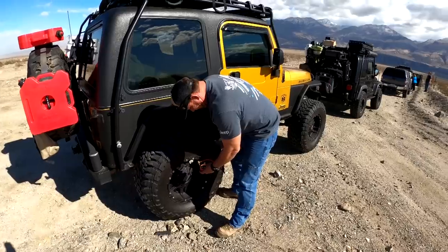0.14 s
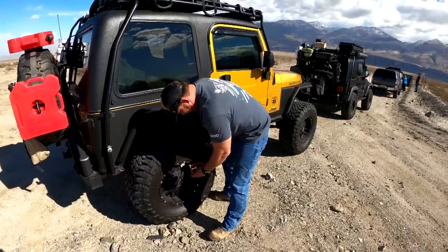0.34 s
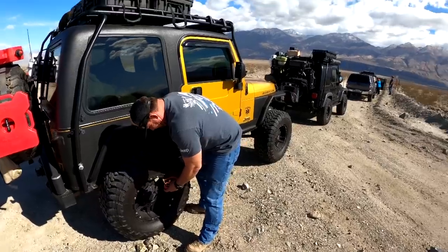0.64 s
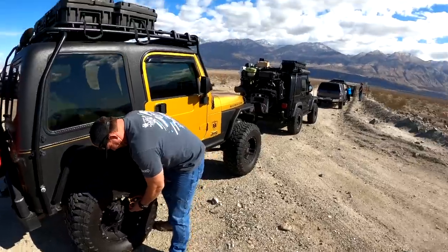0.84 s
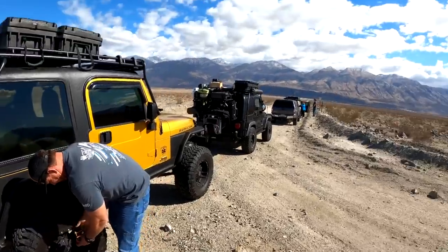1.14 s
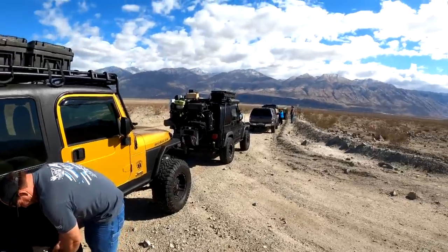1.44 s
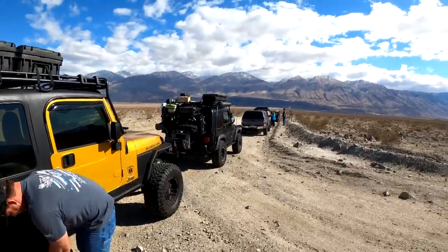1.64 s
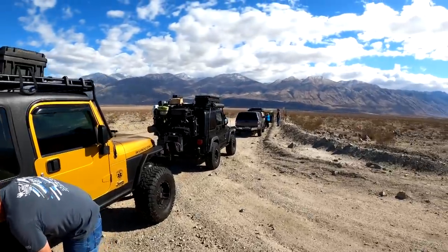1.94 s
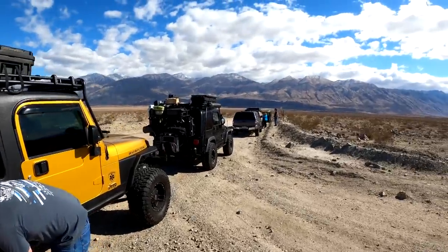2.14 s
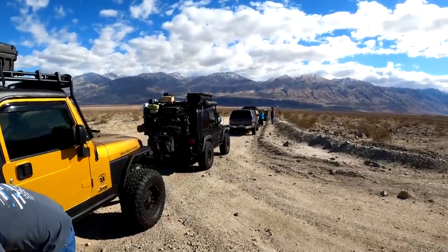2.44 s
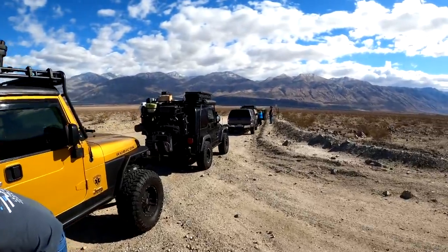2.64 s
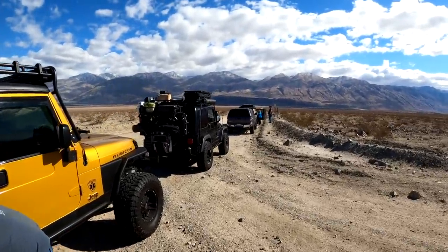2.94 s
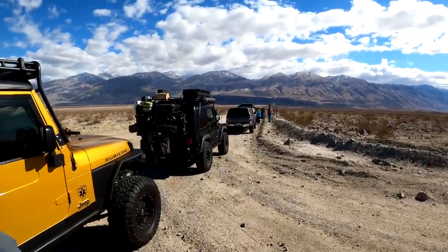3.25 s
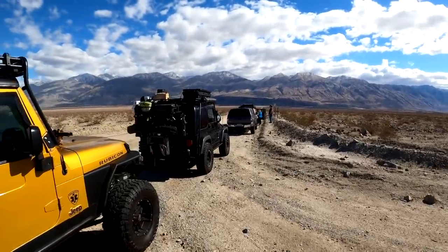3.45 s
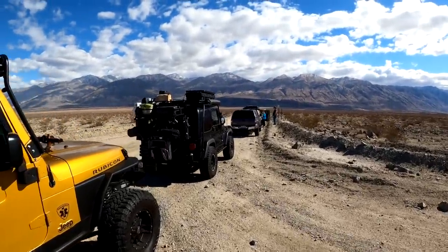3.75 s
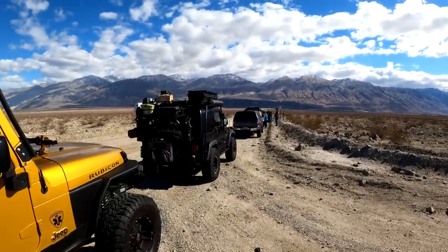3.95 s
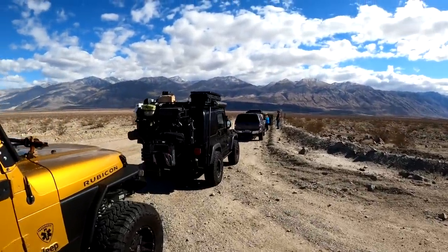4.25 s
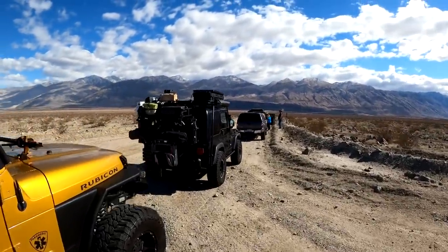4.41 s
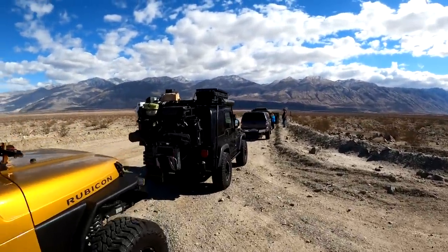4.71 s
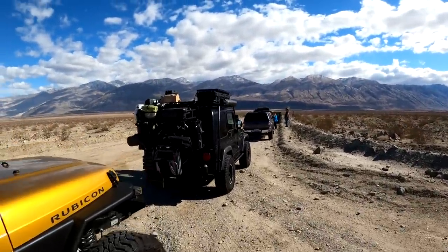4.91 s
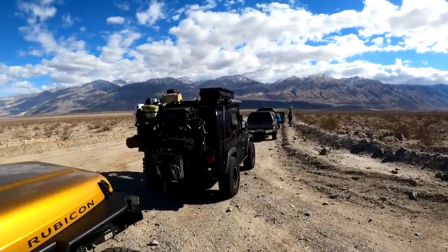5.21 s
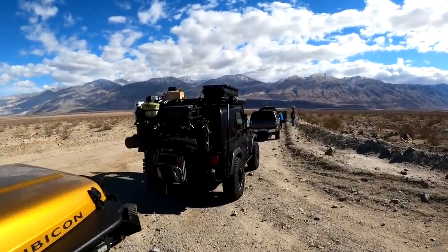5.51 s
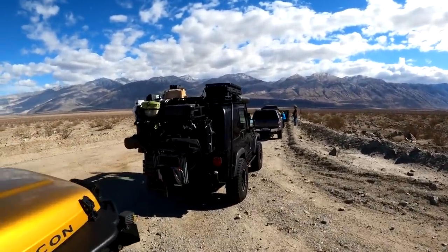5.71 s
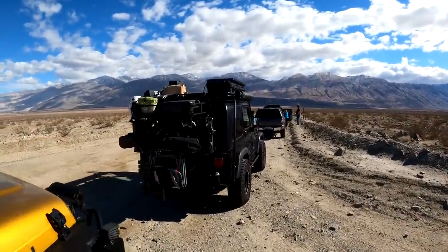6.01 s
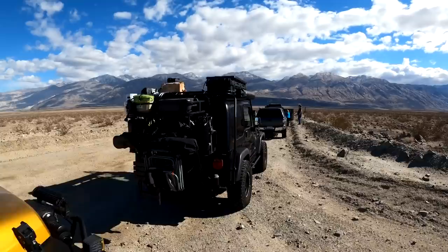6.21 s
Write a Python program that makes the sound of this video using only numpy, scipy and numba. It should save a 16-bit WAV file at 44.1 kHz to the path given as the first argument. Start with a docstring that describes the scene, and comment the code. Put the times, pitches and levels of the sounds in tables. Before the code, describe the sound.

A bright, unbroken hiss of escaping tyre air over buffeting low wind, growing duller and fainter as the microphone walks away across dirt and stones.

```python
"""On a dirt road, air hisses from the valve of an off-road tyre as a hand-held camera walks past and away.
The jet is shaped noise; delayed copies stand for echoes off wheel arch, panels and ground and comb its spectrum.
Moving resonances colour it; it fades as the camera recedes, and at last the bonnet shades its short waves.
Choppy wind on the microphone is low noise under gust envelopes, with rough puffs for the strongest eddies.
A few steps scuff the dirt as bursts of grainy noise; small stones knock as damped modes."""
import sys
import numpy as np
from scipy import signal
from scipy.fft import rfft, irfft, next_fast_len
from scipy.io import wavfile
from scipy.ndimage import uniform_filter1d, map_coordinates
from numba import njit

SR = 44100
rng = np.random.default_rng(int(sys.argv[2]) if len(sys.argv) > 2 else 0)


def persist_wave(psi):
    """Save psi, clipped to +-1, as 16-bit WAV."""
    counts = np.round(np.clip(psi, -1, 1) * 32767).astype(np.int16)
    wavfile.write(sys.argv[1], SR, np.atleast_2d(counts).T)


N = 280917
TIME = np.arange(N) / SR  # s

# strong eddies that strike the microphone port:
# [t/s, puff level/dB, length/s, speed relative to a typical eddy]
STRONG_EDDIES = [(0.09, -28, 0.011, 0.87), (.13, -31, 0.045, 0.38), (0.156, -22.5, 0.011, 0.98),
                 (0.204, -31, 0.016, 0.96), (.24, -30, 0.011, 1.2), (0.313, -27, 0.0048, 0.9),
                 (.34, -28, 0.04, 0.4), (0.364, -28, 0.016, 0.63), (1, -33, 0.069, 0.9),
                 (1.09, -32, 0.026, .75), (1.141, -26, 0.048, 0.97), (1.196, -29.5, 0.067, 1.02),
                 (1.294, -26.5, .055, 0.93), (1.333, -30, .01, 0.94), (1.379, -29.5, 0.018, 1.18),
                 (1.595, -26, 0.0058, 1.15), (1.608, -20, 0.01, 1.04), (1.635, -23, 0.03, 0.49),
                 (1.791, -31, 0.023, 1.53), (1.832, -28, 0.034, 0.92), (1.88, -31, 0.0068, 1.25),
                 (1.904, -24, 0.01, 0.97), (1.933, -28, 0.0074, 1.13), (2.005, -32, 0.038, 0.86),
                 (2.189, -27.5, 0.037, 0.81), (2.235, -33.5, 0.053, 0.88), (2.356, -30.5, 0.023, 0.71),
                 (2.46, -26.5, 0.02, 0.77), (2.529, -28.5, 0.02, 0.97), (2.541, -23.5, 0.005, 1.4),
                 (2.955, -33.5, .035, 1.1), (3.074, -31, 0.014, 1.25), (3.101, -22, 0.054, 0.49),
                 (3.151, -32, 0.08, 0.88), (3.603, -29, 0.015, 0.33), (4.098, -25, 0.021, 0.81),
                 (4.185, -25, 0.013, 0.42), (5.293, -22, 0.018, 0.51), (5.342, -39.5, 0.024, 0.42),
                 (5.411, -29, 0.014, .5), (5.485, -24.5, 0.03, 0.57), (5.495, -21, 0.0037, 1.4),
                 (5.629, -19, 0.029, 0.81), (5.655, -21, 0.0081, 1.1), (5.687, -21.5, 0.015, 0.99),
                 (5.728, -26.5, 0.037, 0.95), (5.787, -24.5, 0.014, 1.23), (5.805, -18.5, 0.021, 1.07),
                 (5.828, -18.5, 0.015, 1.65), (5.845, -22, 0.011, 1.24), (5.865, -26.5, 0.028, 0.47),
                 (5.944, -31.5, 0.0088, 1.2), (5.984, -25, 0.008, 0.99), (6.004, -28, 0.026, 0.87),
                 (6.066, -15.5, 0.0067, 1.43), (6.074, -24.5, 0.012, 1.06), (6.194, -22.5, 0.013, 1.12),
                 (6.213, -23, .014, 1.3), (6.226, -21, 0.0047, 1.56), (6.249, -28, 0.019, 1.05),
                 (6.327, -29, 0.035, 1)]


def undb(db):
    """Level is logarithmic: 20 dB is a factor of ten in amplitude."""
    return 10 ** (np.asarray(db) / 20)


def unit(x):
    """Normalisation by the root mean square: scale to rms 1."""
    return x / np.sqrt(np.mean(x ** 2))


def steady(x, seconds):
    """Short-time normalisation: scale to a running rms of 1."""
    power = np.abs(uniform_filter1d(x ** 2, int(seconds * SR)))
    return x / np.sqrt(power + 1e-18)


def curves(table):
    """Linear interpolation: the columns after t/s, as one value a sample."""
    s, *columns = np.transpose(table)
    return [np.interp(TIME, s, column) for column in columns]


def ramp(start_s, length_s):
    """Linear transition: rise from 0 to 1, then hold."""
    return np.clip((TIME - start_s) / length_s, 0, 1)


def noise(colour):
    """Spectral shaping: white noise filtered to [f/Hz, level/dB] points, then scaled to rms 1."""
    size = next_fast_len(N, True)
    hz, db = np.transpose(colour)
    f = np.maximum(np.fft.rfftfreq(size, 1 / SR), 1)
    gain = undb(np.interp(np.log(f), np.log(hz), db))
    gain *= np.minimum(f / hz[0], 1)  # 6 dB per octave down below the first point
    gain /= np.maximum(f / hz[-1], 1) ** 2  # 12 dB per octave down above the last
    white = rng.standard_normal(size)
    return unit(irfft(rfft(white) * gain, size)[:N])


def waver(rate):
    """Slow random modulation: levels held 1 / rate s and slewed, rms 1."""
    k = int(SR / rate)
    held = np.repeat(rng.standard_normal(N // k + 1), k)
    return unit(uniform_filter1d(held, k)[:N])


def below(x, hz):
    """Zero-phase low-pass: without delay, the remainder is the matching high-pass."""
    sos = signal.butter(4, hz, fs=SR, output="sos")
    return signal.sosfiltfilt(sos, x, padtype="even")


def swells(table):
    """Addition of powers: the envelope of bell-shaped bursts [t/s, level/dB, length/s]."""
    power = np.zeros(N)
    for s, db, length in table:
        power += undb(2 * db) * np.exp(-np.minimum((2 * (TIME - s) / length) ** 2, 20))
    return np.sqrt(power)


def jet():
    """Turbulent jet noise: broadband air through gliding resonances, directional in the treble and shaded."""
    # the jet as heard from each side of the wheel, before receding and shading:
    # [t/s, rush level/dB, hiss level/dB, treble level/dB]
    jet_levels = [(0, -41, -29, -33.5), (1.02, -45, -31, -33), (1.28, -44, -32.5, -33.5),
                  (2, -47, -35, -34.5), (3.05, -40, -30, -33.5), (3.5, -39.5, -31, -35),
                  (3.9, -39.5, -31.5, -31.5), (4.4, -39.5, -30, -35.5)]
    # colour of the air ahead of echoes and resonances: [f/Hz, relative level/dB]
    jet_colour = [(300, -5.5), (600, -9), (1000, -5), (1450, -3), (1900, -1.5), (2600, -3.5), (3500, -2.5),
                  (4500, -2), (6100, 0.5), (7500, -0.5), (9700, -4.5), (10800, -8), (12400, -14.5),
                  (15000, -31.5)]
    # bands that glide as the camera passes the wheel; a negative boost is a hollow:
    # [t/s, centre f/Hz, boost level/dB]
    rush_ridge = [(0, 1210, 9.5), (2, 1200, 4.5), (2.6, 1110, 3), (3.2, 1090, 11), (4.2, 970, 5),
                  (5, 1000, -1)]
    upper_rush_ridge = [(1.7, 1650, 2), (2.3, 1710, -2), (2.75, 1910, 5.5), (3.25, 1800, 6.5),
                        (3.8, 1950, -0.5), (5.2, 1900, -3)]
    low_ridge = [(0, 2270, 5), (1, 2280, 4), (1.3, 2850, 2.2), (2.3, 2650, 4.1), (3.3, 2620, 4.7),
                 (3.9, 2600, 3.3), (4.4, 2400, 3.1), (5.4, 2160, 1.3), (6.37, 2530, 7.8)]
    mid_ridge = [(0, 3350, 5.7), (.4, 3500, 4.5), (.95, 3230, 9.3), (1.25, 3180, 2.6), (1.6, 3380, 3.4),
                 (2.9, 3480, 3.8), (3.4, 3720, 1), (4.4, 3180, 2), (5.6, 3830, .7), (6.37, 3900, 1.3)]
    high_ridge = [(0, 6200, 1), (1, 5500, 1), (2.2, 5630, 2.5), (3.2, 5000, 3.5), (3.7, 5700, 5.5),
                  (5.2, 5200, -1.5), (6.37, 5800, 3)]
    hollow = [(0, 7000, -8), (1.1, 7400, -1.5), (2, 7530, -8.5), (3, 7270, -10.5), (3.7, 7650, -5),
              (4.4, 7640, -1), (6.37, 7600, -1)]
    valve_ring = [(0, 8300, 3), (1.1, 8500, 3.5), (1.5, 8600, 11), (2, 8440, 5.9), (3.4, 8470, 4.6),
                  (5.2, 8450, 2.4), (6.37, 8540, 6.4)]
    top_ridge = [(0, 9100, 9.5), (.85, 9180, 9.3), (1.2, 9600, 1), (1.7, 10300, 5.1), (2.3, 9800, 5),
                 (3.2, 9500, 3.7), (4.2, 9800, 1)]
    # brief dips of the level: [t/s, change of level/dB, length/s]
    dips = [(5.55, -3, 0.047), (5.68, -0.5, .05), (5.845, -5, 0.072), (6.075, -2, .05)]
    flicker_db, sway_db = 0.79, 0.66  # rms, of each band and of the whole

    rush_db, hiss_db, treble_db = curves(jet_levels)
    air = reflect(noise(jet_colour))
    air = resonate(air, rush_ridge, width_hz=230)
    air = resonate(air, upper_rush_ridge, width_hz=320)
    air = resonate(air, low_ridge, width_hz=440)
    air = resonate(air, mid_ridge, width_hz=750)
    air = resonate(air, high_ridge, width_hz=520)
    air = resonate(air, hollow, width_hz=1100)
    air = resonate(air, valve_ring, width_hz=450)
    air = resonate(air, top_ridge, width_hz=530)

    # rush, hiss, sizzle and top swell apart with the angle to the valve
    low, mid, high = below(air, 1900), below(air, 4500), below(air, 7700)
    away = ramp(4.36, 0.85)  # the camera draws away along the car
    sizzle_db = treble_db - 3 * away
    top_db = sizzle_db - 1 - 0.2 * TIME  # the top dulls as the camera leaves the beam of the jet
    bands = [  # signal, typical f/Hz, level/dB
        (low, 1400, rush_db - 0.5 * away),
        (mid - low, 3000, hiss_db - 6.5 * away),
        (high - mid, 5500, sizzle_db),
        (air - high, 9500, top_db),
    ]
    heard = np.zeros(N)
    for band, hz, db in bands:
        level_db = db + bonnet_shade_db(hz) + flicker_db * waver(30)
        heard += steady(band, 0.55) * undb(level_db)

    dip_db = sum(db * np.exp(-(2 * (TIME - s) / length) ** 2) for s, db, length in dips)
    return heard * undb(dip_db + sway_db * waver(10))


def reflect(x):
    """Comb filtering: short echoes off panels and stones; their paths change, so ripples slide in the spectrum."""
    # large reflecting panels: [extra path at the start/ms, at the end/ms, strength 0-1]
    panels = [(1.33, 2.9, 0.04), (2.08, 0.87, 0.09), (2.6, 4.4, 0.03)]
    # the walk: [t/s, share of the way 0-1]
    walk = [(0, 0), (.8, .07), (2, .24), (6.37, .98)]
    count, scatter, travel_ms = 18, 0.25, 1.4  # scattered stones, strength, typical change of path

    way = curves(walk)[0] + 0.008 * waver(3)  # the hand sways as it goes
    paths_ms = rng.uniform(1.8, 9, count)
    shifts_ms = travel_ms * rng.uniform(0.4, 1.4, count) * rng.choice([-1, 1], count)
    echoes = list(panels)
    for k, (path, shift) in enumerate(zip(paths_ms, shifts_ms)):
        strength = (-1) ** k * scatter / np.sqrt(2 * path)  # longer paths return less
        echoes.append((path - shift / 2, path + shift / 2, strength))

    sample = np.arange(N)
    out = x.copy()
    for start_ms, end_ms, strength in echoes:
        lag = (start_ms + (end_ms - start_ms) * way) * SR / 1000  # samples
        out += strength * np.interp(sample - lag, sample, x)
    return unit(out)


def resonate(x, track, width_hz):
    """Resonance: lift or hollow one gliding band; its centre wanders as the hand moves."""
    hz, boost_db = curves(track)
    centre_hz = hz + 0.011 * np.sqrt(hz * 3000) * waver(4)
    return x + (undb(boost_db) - 1) * bandpass(x, centre_hz, float(width_hz))


@njit
def bandpass(x, hz, width):
    """Second-order resonator: a state-variable band-pass with a moving centre, gain 1 at the centre."""
    y, band, low = np.empty(len(x)), 0., 0.
    for i in range(len(x)):
        g = np.tan(np.pi * hz[i] / SR)
        damping = width / hz[i]
        v = (band + g * (x[i] - low)) / (1 + g * (g + damping))
        band = 2 * v - band
        low = low + 2 * g * v
        y[i] = damping * v
    return y


def bonnet_shade_db(hz):
    """Diffraction: long waves bend round the bonnet; short ones are cut off sooner and more deeply."""
    octaves = np.log2(hz / 570)  # above the frequency where shading starts
    return -3 * octaves * ramp(5.77 - 0.082 * octaves, 0.39)


def steps():
    """Granular friction: grit crunches under the soles in quick uneven grains."""
    # shoes on the dirt: [t/s, level/dB, length/s]
    footfalls = [(3.13, -46, .08), (4.335, -37, 0.064), (5.05, -41, .08), (5.70, -32, 0.1)]
    # colour of the grit: [f/Hz, relative level/dB]
    dirt_colour = [(150, -4), (400, -4), (1000, 3), (1800, -11), (3000, -25), (8000, -32)]
    grains = noise(dirt_colour) * undb(-0.5 * waver(300))
    return steady(grains, 0.022) * swells(footfalls)


def knocks():
    """Modal impact: each stone rings a few heavily damped modes at its own pitch and strikes again."""
    # first blows of stone on stone: [t/s, gain of the modes/dB]
    blows = [(4.9815, -18.5), (5.023, -25), (5.039, -19.5), (5.102, -26), (5.169, -27), (5.5305, -13.5),
             (5.658, -22), (5.703, -20), (5.722, -20)]
    # what a small stone rings with, at middle size: [f/Hz, level/dB, t60/s]
    stone_modes = [(760, -10, .012), (1100, -3, .014), (1480, -3, .011), (1950, -5, .009)]
    rebound_s, rebound_db, spread = 0.0028, -5, 0.075  # spread: rms of the natural log of pitch

    out = np.zeros(N)
    age = TIME[:SR // 20]
    for (s, level_db), size in zip(blows, rng.standard_normal(len(blows))):
        pitch = np.exp(spread * size)
        ring = np.zeros(len(age))
        for k, (hz, db, t60) in enumerate(stone_modes):
            decay = np.exp(-np.log(1000) * age / t60)
            ring += (-1) ** k * undb(db) * decay * np.sin(2 * np.pi * hz * pitch * age)
        for start, db in ((s, level_db), (s + rebound_s, level_db + rebound_db)):
            i = int(start * SR)
            out[i:i + len(age)] += undb(db) * ring
    return out


def wind():
    """Turbulent pressure on the port: slow eddies rumble, smaller ones flutter, the strongest reach the midrange."""
    # colours of the large and the small eddies: [f/Hz, relative level/dB]
    rumble_colour = [(12, -13), (28, 1.5), (70, 2), (120, -2.5), (170, -8), (240, -18.5), (450, -57)]
    flutter_colour = [(100, -22.5), (200, 2.5), (300, -2.5), (450, -12), (750, -24.5), (1200, -54),
                      (3000, -55)]
    # the eddies slow and deepen beside the bonnet: [t/s, speed relative to a typical eddy]
    swirl_speed = [(0, 1.138), (3.2, 1.082), (4.2, .88), (6.37, 0.87)]

    gust_rumble, gust_flutter = gusts()
    wake = eddy_wake()
    rumble_gain = np.hypot(gust_rumble, undb(-24) * wake)
    patchy_flutter = gust_flutter * undb(3.5 * waver(24))
    flutter_gain = np.hypot(patchy_flutter, undb(-33) * wake)

    # reading the noise at the speed of the eddies scales its frequencies
    pace, = curves(swirl_speed)
    carried = map_coordinates(noise(rumble_colour), [np.cumsum(pace)], order=1, mode="mirror")
    swirl = steady(carried * undb(1.0 * waver(65)), 0.0453)
    # small eddies ride on the crests of the large ones
    crests = np.abs(swirl) - np.mean(np.abs(swirl))
    chop = unit(crests + 0.75 * waver(65))
    flutter = unit(steady(noise(flutter_colour) * undb(4.0 * chop), 0.06))
    return unit(swirl) * rumble_gain + flutter * flutter_gain + buffets()


def gusts():
    """Amplitude modulation: each gust swells, holds and dies back to the lull, surging at random."""
    # gusts at the microphone, before surging: [t at full strength/s, rise/s, hold/s, fall/s,
    # rumble level/dB, flutter level relative to the rumble/dB]
    gust_table = [(0.001, 0.043, 0.36, 0.12, -22, -11), (0.458, 0.17, 0.77, 0.22, -21, -17),
                  (1.374, 0.15, 0.15, .1, -22.5, -16), (1.615, 0.12, 0.21, 0.12, -21.5, -16),
                  (1.963, .08, 0.33, 0.18, -22.5, -17.5), (2.478, 0.17, 0.16, 0.088, -21, -17.5),
                  (2.77, 0.16, 0.48, 0.081, -24, -13.5), (3.271, 0.063, 0.073, 0.029, -25, -19),
                  (3.424, 0.034, .48, .04, -42, -30), (3.56, 0.04, 0.075, 0.054, -26.5, -30),
                  (3.715, .035, 0.032, 0.04, -22, -19), (3.79, 0.022, .015, 0.021, -27.5, -20),
                  (4.028, 0.057, 0.16, 0.15, -22.5, -19), (4.392, 0.066, .1, .08, -29.5, -19),
                  (4.562, 0.068, 0.056, 0.14, -23.5, -19), (4.942, 0.096, 0.027, .04, -28.5, -15),
                  (5.29, 0.025, .12, 0.046, -22, -23), (5.473, .04, 0.23, .06, -23.5, -18),
                  (5.784, 0.059, 0.026, 0.062, -18, -20), (5.91, 0.045, 0.41, .1, -23, -21)]
    lull = undb(1 * waver(14))
    rumble, flutter = undb(-43) * lull, undb(-59.5) * lull
    for s, rise, hold, fall, db, flutter_db in gust_table:
        strength = ramp(s - rise, rise) * (1 - ramp(s + hold, fall))
        held = undb(db) * np.sin(np.pi / 2 * strength) ** 2
        rumble = np.hypot(rumble, held)
        flutter = np.hypot(flutter, held * undb(flutter_db))
    surge = undb(1.7 * waver(22))
    return rumble * surge, flutter * surge


def eddy_wake():
    """Level compression: a wake outlasts its eddy; strong eddies leave only moderately stronger wakes."""
    wake_s, wake_law, typical_db = 0.023, 0.41, -30  # extra length, dB per dB of the eddy, reference
    bursts = []
    for s, db, length, _ in STRONG_EDDIES:
        longer = length + wake_s
        thinned_db = 10 * np.log10(length / longer)  # spread over the longer time
        bursts.append((s, wake_law * (db - typical_db) + thinned_db, longer))
    return swells(bursts)


def buffets():
    """Frozen turbulence: each strong eddy is a rough puff, higher in pitch the faster it crosses the port."""
    # colour of a puff at typical speed: [f/Hz, relative level/dB]
    puff_colour = [(80, 3), (220, 9.5), (450, 4), (750, -6), (1100, -18), (1500, -25), (4000, -70)]
    air = steady(noise(puff_colour) * undb(3.5 * waver(250)), 0.012)
    out = np.zeros(N)
    for s, db, length, speed in STRONG_EDDIES:
        near = np.flatnonzero(np.abs(TIME - s) < 2 * length)
        crossing = s * SR + (near - s * SR) * speed
        puff = map_coordinates(air, [crossing], order=1, mode="mirror")
        bell = np.exp(-2 * ((TIME[near] - s) / length) ** 2)
        out[near] += undb(db) * bell * puff
    return out


def scene():
    """Superposition: the sources add, and everything reaches both channels alike."""
    mono = jet() + wind() + steps() + knocks()
    return np.array([mono, mono])


def record(dry):
    """Saturation and band limiting: the camera rounds the strongest peaks and cuts the top."""
    soft = np.tanh(1.5 * dry) / 1.5
    top_cut = signal.ellip(10, 0.2, 80, 15050, fs=SR, output="sos")  # ripple dB, stop dB, edge Hz
    return signal.sosfilt(top_cut, soft)


dry = scene()
out = record(dry)
persist_wave(out)
```